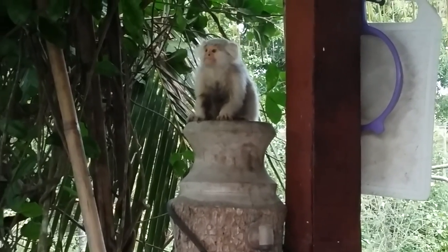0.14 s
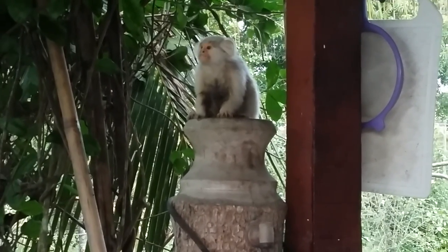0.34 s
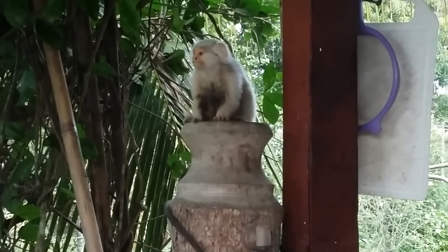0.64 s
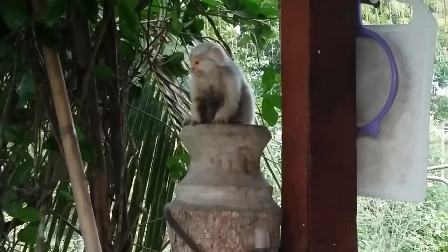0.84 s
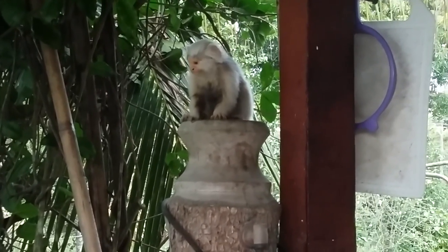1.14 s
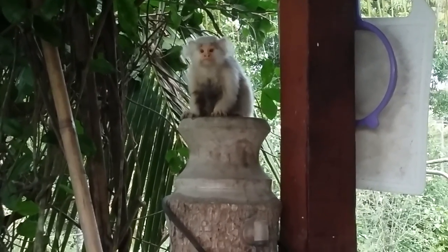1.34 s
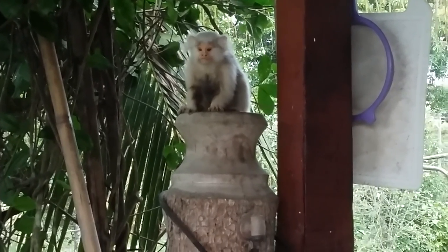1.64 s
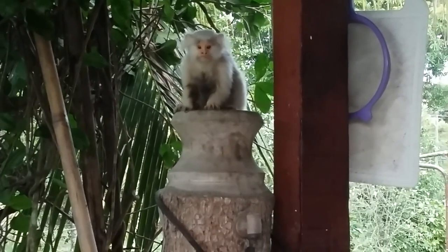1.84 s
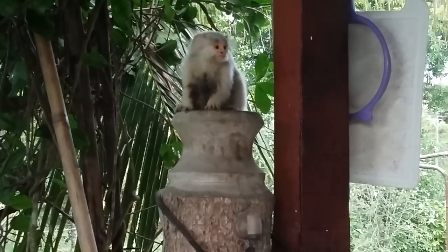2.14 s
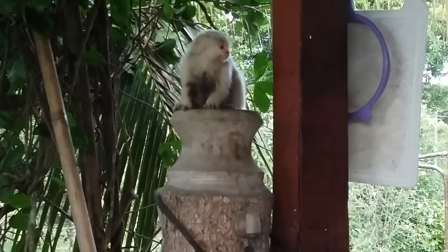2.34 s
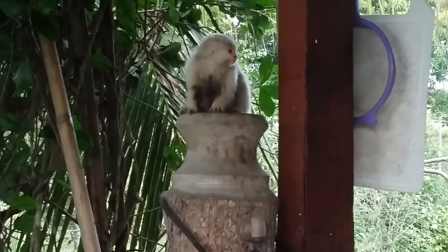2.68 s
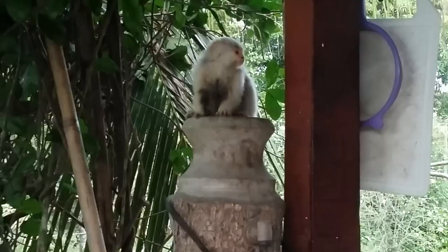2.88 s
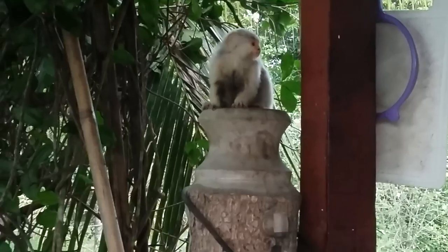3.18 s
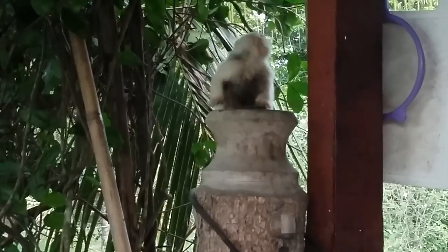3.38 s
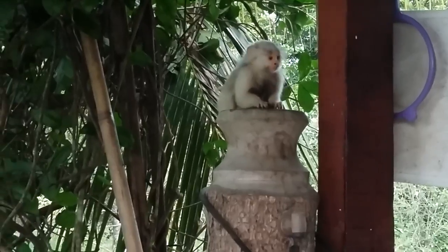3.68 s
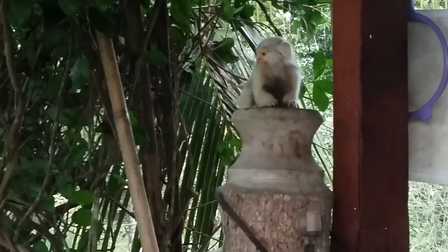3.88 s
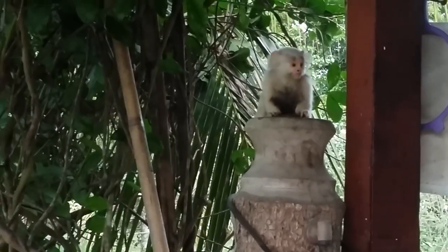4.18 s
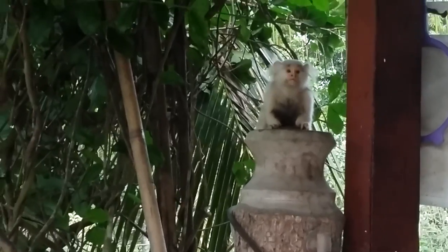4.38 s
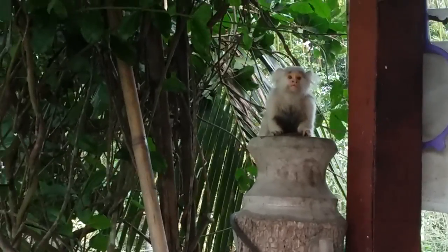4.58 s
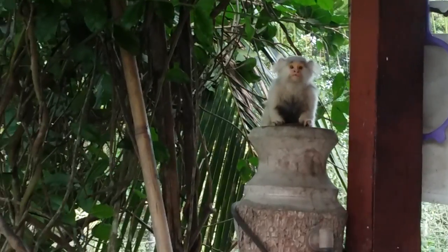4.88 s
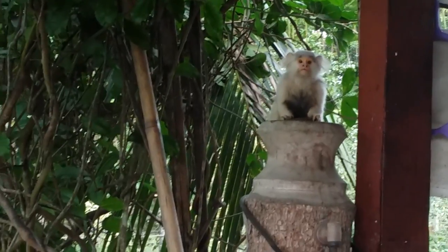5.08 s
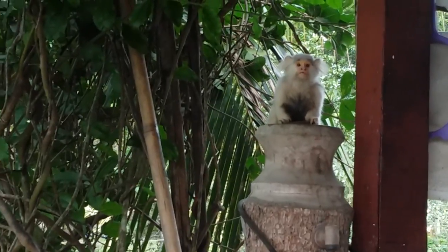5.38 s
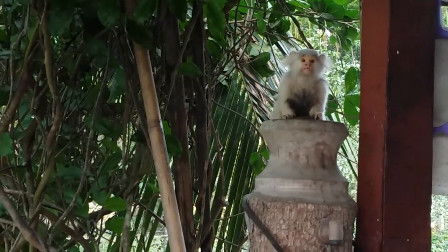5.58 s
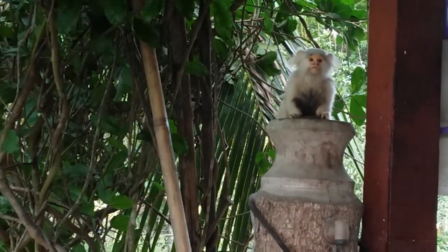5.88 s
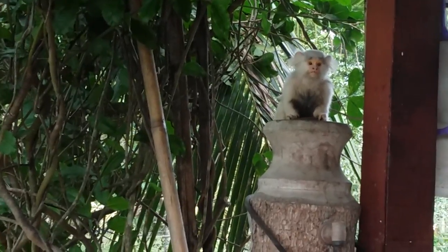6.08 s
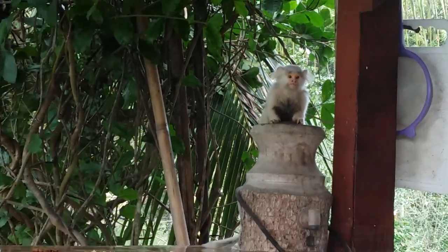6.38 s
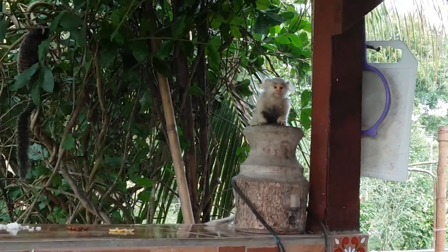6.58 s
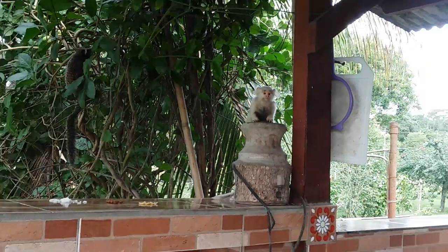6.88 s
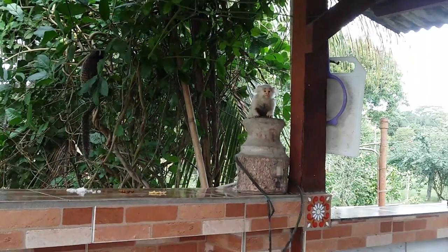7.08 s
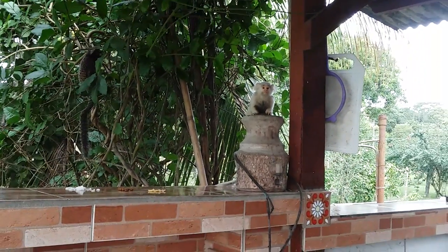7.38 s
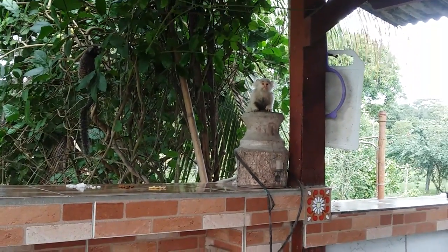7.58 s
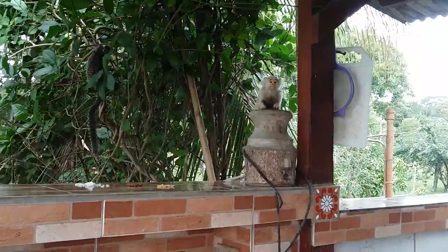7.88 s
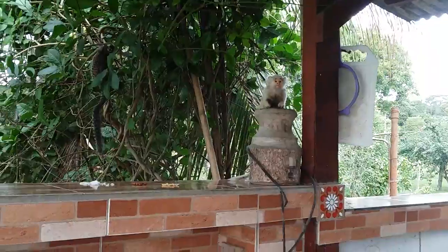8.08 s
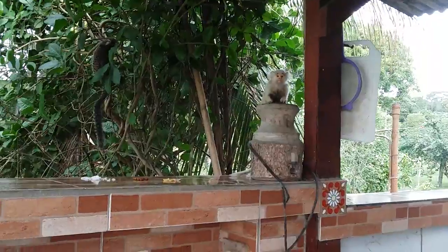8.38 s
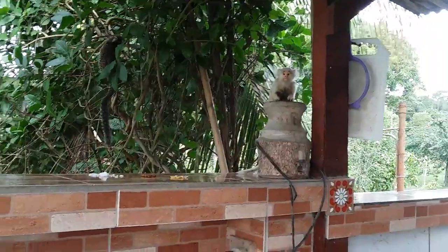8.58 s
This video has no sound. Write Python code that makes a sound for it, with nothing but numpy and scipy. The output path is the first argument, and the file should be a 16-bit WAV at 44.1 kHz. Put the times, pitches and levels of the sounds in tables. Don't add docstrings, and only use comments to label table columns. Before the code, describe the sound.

In a leafy garden by a porch, a low motor hums steadily with distant traffic. A quick twitter comes first, then five clear sliding whistles from a small monkey, mostly falling. Leaves rustle, a distant buzzy see-saw song follows, then two chips. The hum weakens and a softer twitter closes with a dull wooden knock. Small outdoor microphone, calls blurred by foliage.

```python
import sys
import numpy as np
from scipy import signal
from scipy.fft import rfft, irfft
from scipy.io import wavfile
from scipy.ndimage import uniform_filter1d

SR = 44100
rng = np.random.default_rng(int(sys.argv[2]) if len(sys.argv) > 2 else 0)


def gain_from_decibels(decibels):
    exponent = np.asarray(decibels, float) / 20
    return 10 ** exponent


def file_out(sig):
    cols = np.atleast_2d(sig).T
    lim = np.clip(cols, -1, 1)
    pcm = np.round(lim * 32767).astype(np.int16)
    wavfile.write(sys.argv[1], SR, pcm)


N = 385434

# freq_hz, density_db
RUMBLE_SPECTRUM = [(16, -54), (28, -16.5), (38, -20), (65, -13.5), (92, -3), (114, -4), (145, -5),
                   (188, -6), (279, -8.5), (339, -17.5), (420, -22.5), (550, -55.5), (920, -120)]
# freq_hz, density_db
HISS_SPECTRUM = [(190, -9.5), (330, -6.5), (400, 0.7), (580, -3.5), (1050, -2.5), (1680, -6), (2460, -4.5),
                 (3100, -9.5), (3700, -14), (5000, -19.5), (6600, -26.5), (7800, -36.5), (9500, -34),
                 (16500, -31.5)]
# time_s, change_db
TRAFFIC_LEVEL = [(0, 1), (1.3, -0.5), (2.97, 3), (4.45, 1.5), (4.7, 0), (5.4, -4), (5.8, -2.5), (7.33, -8),
                 (8.3, -5.5), (8.74, -7.5)]
# peak_s, half_width_s, level_db
MIDDLE_HISS_SWELLS = [
    (.3, 1, -71.5),
    (3.35, 0.25, -66),
    (4.6, .3, -70),
    (5.3, 0.5, -68.5),
    (8.62, 0.21, -78),
]
# time_s, pitch_hz, level_db
MOTOR_TONE = [(0, 87.9, -33), (2.85, 88.63, -33.5), (3.7, 86.8, -33), (4.45, 86.9, -37), (4.6, 87.82, -37),
              (4.68, 89.7, -45), (4.79, 90.94, -41), (4.89, 90.67, -62), (5.03, 91.3, -38),
              (5.15, 89.1, -48), (5.36, 89.37, -47), (5.8, 88.2, -42), (6.3, 88.36, -40.5),
              (7.08, 89.6, -49), (7.25, 88.4, -59), (7.54, 88.5, -44), (7.9, 87.5, -42.5),
              (8.74, 88.54, -45)]
# time_s, pitch_hz, level_db
VEHICLE_THROB = [(0, 53, -67.5), (1.2, 48.6, -58), (2.1, 49.4, -50), (2.87, 51.9, -43), (3.1, 46.5, -49.5),
                 (3.6, 48.9, -42), (4.2, 46.3, -53), (4.6, 46, -42.5), (5.4, 44.3, -52.5), (6.2, 45.5, -58),
                 (7.4, 45.5, -56), (7.7, 49.7, -64), (8.74, 56.4, -56)]
# start_s, decay_s, level_db, low_hz, sheen_db (sheen: above 8 kHz)
LEAF_RUSTLES = [
    (1.787, .08, -93, 4970, -77.5),
    (3.141, 0.063, -51.5, 600, -74.5),
    (3.18, 0.55, -64.5, 3320, -75.5),
    (3.333, 0.033, -56, 3220, -78),
    (4.313, .016, -54, 586, -72.5),
    (4.336, 0.087, -57.5, 2010, -69),
    (4.4, .045, -59, 3500, -66),
    (4.431, 0.15, -70, 3000, -74),
]
# start_s, decay_s, level_db, low_hz, high_hz
TWIG_KNOCKS = [
    (6.173, 0.0071, -54, 1817, 5630),
    (6.934, 0.0066, -50.5, 1200, 5240),
    (8.437, 0.085, -50, 392, 3120),
    (8.511, .036, -63.5, 2500, 5940),
]
# start_s, length_s, start_hz, end_hz, level_db
DISTANT_NOTES = [(0, 0.034, 3440, 2450, -54), (.23, 0.064, 4500, 3960, -59.5),
                 (.31, .069, 4930, 3940, -57.5), (.38, 0.073, 5120, 3930, -62.5),
                 (3.78, 0.038, 6800, 5830, -67), (4.81, .043, 6630, 5800, -70),
                 (6.81, 0.055, 2945, 2744, -61.5), (7.01, 0.0425, 2900, 3330, -67),
                 (7.25, 0.078, 2620, 3260, -65), (7.44, 0.033, 2950, 3170, -62),
                 (7.63, 0.033, 3100, 2680, -59), (7.42, 0.11, 1114, 1170, -63),
                 (7.75, 0.093, 1200, 1176, -63), (8.405, .036, 6460, 5440, -67),
                 (8.47, .05, 6670, 5400, -69), (8.53, 0.045, 5360, 6380, -69)]
# start_s, length_s, start_hz, end_hz, level_db
FAINT_NOTES = [
    (.115, 0.13, 5070, 5040, -75),
    (.134, 0.14, 3820, 4350, -76),
    (3.745, .07, 5040, 5070, -73),
    (4.211, 0.059, 5150, 5000, -70),
    (5.14, 0.059, 5950, 5892, -79),
    (8.335, 0.061, 7300, 6950, -73.5),
    (8.658, .046, 5700, 5470, -74),
]
# start_s, length_s, top_hz, level_db
ARCHED_NOTES = [
    (1.134, .012, 3130, -58),
    (1.172, 0.017, 2650, -51),
    (1.211, 0.057, 2580, -53),
    (1.249, 0.069, 2670, -80),
    (4.38, 0.054, 2840, -60.5),
    (6.116, 0.03, 3000, -56),
    (8.393, .022, 2600, -53),
    (8.441, 0.059, 2450, -60),
    (8.494, 0.035, 2490, -58),
]
# start_s, top_hz, bottom_hz, level_db
CHIP_CALLS = [
    (5.508, 6320, 4767, -57),
    (5.571, 5910, 4660, -50.5),
]
# start_s, pitch_hz, flick_hz, level_db, flick_db
PEEP_CALLS = [
    (1.131, 7120, 7930, -60.5, -75),
    (2.278, 7130, 8400, -59.5, -78),
    (2.671, 7160, 8140, -56, -86),
    (6.979, 7270, 8550, -59, -82),
    (7.96, 7340, 8460, -56, -74),
]
# start_s, arch_top_hz, arch_db, scoop_delay_s, scoop_db
SEESAW_SONG = [
    (4.489, 4850, -51, 0.096, -53.5),
    (4.689, 4900, -50, 0.095, -51.5),
    (4.895, 4730, -48.5, 0.096, -51.5),
    (5.104, 4766, -46.5, .098, -51.5),
    (5.32, 4780, -47, .088, -51),
]
# start_s, drop_top_hz, drop_db, arch_top_hz, arch_db
TWITTER_SYLLABLES = [(0.467, 3340, -50, 2800, -52), (0.581, 3610, -50.5, 2610, -51.5),
                     (.695, 3780, -51, 2860, -50), (0.81, 3770, -50, 3076, -48.5),
                     (0.917, 4170, -50, 3085, -48.5), (1.033, 4270, -50.5, 2960, -50),
                     (7.734, 3770, -60, 2785, -56.5), (7.847, 3800, -56.5, 3050, -51.5),
                     (7.961, 3940, -52, 3050, -51), (8.074, 4080, -51, 3080, -50.5),
                     (8.185, 3880, -51.5, 3030, -51), (8.296, 3940, -52, 3090, -51)]
# time_s, pitch_hz, level_db
WHISTLE_GLIDES = [
    [(1.34, 2376, -58), (1.375, 2378, -42), (1.43, 2144, -36), (1.5, 2000, -45), (1.56, 1883, -51.5),
     (1.62, 1750, -63)],
    [(1.745, 3765, -57.5), (1.77, 3224, -36.5), (1.8, 2627, -28.5), (1.85, 2230, -30), (1.92, 2016, -38),
     (1.97, 1960, -56), (2.005, 1870, -55)],
    [(2.085, 3580, -61.5), (2.125, 3500, -36.5), (2.17, 3246, -31.5), (2.25, 3022, -29.5),
     (2.32, 2743, -39), (2.36, 2667, -45), (2.375, 2620, -69.5)],
    [(2.635, 1668, -53.5), (2.67, 1950, -43), (2.7, 2065, -39.5), (2.75, 1980, -48), (2.79, 1863, -48),
     (2.83, 1636, -60)],
    [(2.945, 2620, -60), (2.98, 2912, -38.5), (3.03, 2776, -29), (3.08, 2580, -37.5), (3.13, 2475, -35),
     (3.18, 2294, -50.5), (3.21, 2240, -65)],
]
# second_db, third_db
WHISTLE_HARMONICS = [(-26.5, -44), (-37.5, -52), (-36.5, -47), (-34, -65), (-40, -53)]


def rms_one(x):
    return x / np.sqrt(np.mean(x ** 2) + 1e-20)


def in_time(rows):
    time_s, *columns = np.transpose(rows)
    return [np.interp(np.arange(N) / SR, time_s, column) for column in columns]


def drift(rate_hz):
    r = np.exp(-80 * np.pi * rate_hz / SR)
    noise = rng.standard_normal(N // 40 + 2002)
    slow = signal.lfilter([1], [1, -2 * r, r * r], noise)[2000:]
    return np.interp(np.arange(N) / 40, np.arange(len(slow)), rms_one(slow))


def coloured(spectrum):
    hz, db = np.transpose(spectrum)
    grid_hz = np.maximum(np.arange(N // 2 + 1) * SR / N, 1)
    shape = gain_from_decibels(np.interp(np.log(grid_hz), np.log(hz), db, -150, -150))
    return rms_one(irfft(rfft(rng.standard_normal(N)) * shape, N))


def narrow_band(centre_hz, width_hz, side_db):
    return coloured([(centre_hz - width_hz, side_db), (centre_hz, 0), (centre_hz + width_hz, side_db)])


def add_glide(out, rows, warble=0.):
    time_s, hz, db = np.transpose(rows)
    i = np.arange(int(time_s[0] * SR), min(int(time_s[-1] * SR), N))
    shake = np.interp(np.arange(len(i)) / 180, np.arange(100), rng.standard_normal(100))
    glide_hz = uniform_filter1d(np.interp(i / SR, time_s, hz), size=len(i) // 8 + 1, mode="nearest")
    phase = 2 * np.pi * np.cumsum(glide_hz * (1 + warble * shake)) / SR
    edge = np.clip(np.minimum(i - i[0], i[-1] - i) / (0.00098 * SR), 0, 1)
    out[i] += np.sqrt(2) * gain_from_decibels(np.interp(i / SR, time_s, db)) * edge * np.sin(phase)


def trees(x, direct_db, early_t60_s, late_db, late_t60_s, wall_db, wall_s, blur_s):
    t = np.arange(SR) / SR
    scatter = gain_from_decibels(-60 * t / early_t60_s) + gain_from_decibels(late_db - 60 * t / late_t60_s)
    scatter = scatter + gain_from_decibels(wall_db) * np.exp(-((t - wall_s) / blur_s) ** 2)
    echo = scatter * rng.standard_normal(SR) * np.clip(t / 0.0017, 0, 1)
    echo = echo / np.sqrt(np.sum(echo ** 2))
    return gain_from_decibels(direct_db) * x + signal.fftconvolve(x, echo)[:N]


def rumble(traffic_db):
    return gain_from_decibels(-51 + 0.7 * traffic_db + 0.66 * drift(3.7)) * coloured(RUMBLE_SPECTRUM)


def hiss_and_breeze(traffic_db):
    t = np.arange(N) / SR
    hiss = coloured(HISS_SPECTRUM)
    lower = signal.sosfiltfilt(signal.butter(2, 3300, fs=SR, output="sos"), hiss)
    top = signal.sosfiltfilt(signal.butter(2, 7500, "high", fs=SR, output="sos"), hiss)
    leaves = hiss - lower - top
    breeze = sum(gain_from_decibels(db) * np.exp(-((t - peak_s) / width_s) ** 2) for peak_s, width_s, db in MIDDLE_HISS_SWELLS)
    stir = np.hypot(gain_from_decibels(-75 + 0.62 * traffic_db), breeze)
    out = gain_from_decibels(-56 + 0.44 * traffic_db + 0.6 * drift(2.4)) * rms_one(lower)
    out = out + stir * gain_from_decibels(2.4 * drift(9.4)) * rms_one(leaves)
    return out + gain_from_decibels(-81.0) * rms_one(top)


def insect():
    whirr_db, = in_time([(0, -100), (4.5, -97), (5.2, -91), (8.74, -90)])
    return coloured([(6950, -20), (7150, 0), (7300, 0), (7500, -20)]) * gain_from_decibels(whirr_db + 3 * drift(9))


def drone():
    stop_s, fade_s = 6.2, 0.045
    gate = np.clip((stop_s - np.arange(N) / SR) / fade_s, 0, 1)
    return narrow_band(280.8, 16, side_db=-12) * gain_from_decibels(-61.5) * gate


def motor(traffic_db):
    hz, db = in_time(MOTOR_TONE)
    beat_start_s, beat_hz, beat_slowing_hz_per_s, beat_depth_db = 6.47, 5.11, .814, 3
    since_s = np.arange(N) / SR - beat_start_s
    beat_phase = 2 * np.pi * since_s * (beat_hz - beat_slowing_hz_per_s * since_s / 2)
    beat_db = beat_depth_db * np.clip(5 * since_s + 1, 0, 1) * np.cos(beat_phase)
    phase = 2 * np.pi * np.cumsum(hz) / SR + 0.37 * drift(7.5)
    firing = gain_from_decibels(db + 0.83 * drift(12) + beat_db) * -np.cos(phase)
    octave = gain_from_decibels(0.61 * traffic_db - 60 + 3.6 * drift(3.4)) * np.sin(2 * phase)
    side_paths = gain_from_decibels(-55) * narrow_band(88, 8, side_db=-15)
    return np.sqrt(2) * (firing + octave) + side_paths


def wavering_tone(hz, db):
    phase = 2 * np.pi * np.cumsum(hz) / SR + 1.1 * drift(4.6)
    return np.sqrt(2) * gain_from_decibels(db + 2.7 * drift(13)) * np.sin(phase)


def vehicle():
    return wavering_tone(*in_time(VEHICLE_THROB))


def neighbour_machine():
    start_hz, rise_hz_per_s, level_db = 99.7, 0.29, -54.5
    return wavering_tone(start_hz + rise_hz_per_s * np.arange(N) / SR, level_db)


def gritty_burst(out, start_s, decay_s, db, low_hz, high_hz, sheen_db):
    t = np.arange(SR) / SR
    grain = gain_from_decibels(2.0 * rng.standard_normal(len(t) // 98).repeat(98))
    grit = rng.standard_normal(len(t)) * grain
    body = signal.sosfilt(signal.butter(8, [low_hz, high_hz], "band", fs=SR, output="sos"), grit)
    sheen = signal.sosfilt(signal.butter(4, 8000, "high", fs=SR, output="sos"), grit)
    fade = np.exp(-(t / decay_s) ** 0.83) * np.clip(t / 0.0027, 0, 1)
    burst = fade * (gain_from_decibels(db) * rms_one(body) + gain_from_decibels(sheen_db) * rms_one(sheen))
    i = int(start_s * SR)
    out[i:i + len(t)] += burst[:N - i]


def rustles():
    out = np.zeros(N)
    for start_s, decay_s, db, low_hz, sheen_db in LEAF_RUSTLES:
        gritty_burst(out, start_s, decay_s, db, low_hz, 6700, sheen_db)
    return out


def twigs():
    out = np.zeros(N)
    for start_s, decay_s, db, low_hz, high_hz in TWIG_KNOCKS:
        gritty_burst(out, start_s, decay_s, db, low_hz, high_hz, db - 26)
    return out


def straight_notes(table, warble):
    out = np.zeros(N)
    for s, length_s, start_hz, end_hz, db in table:
        middle = (s + length_s / 2, (start_hz + end_hz) / 2, db)
        add_glide(out, [(s, start_hz, db - 3), middle, (s + length_s, end_hz, db - 5.0)], warble)
    return out


def arched_notes():
    out = np.zeros(N)
    for s, length_s, hz, db in ARCHED_NOTES:
        rows = [(s, .87 * hz, db - 13.5), (s + length_s / 2, hz, db), (s + length_s, .83 * hz, db - 5.0)]
        add_glide(out, rows, warble=.006)
    return out


def chips():
    out = np.zeros(N)
    for s, top_hz, bottom_hz, db in CHIP_CALLS:
        held = [(s, .99 * top_hz, db), (s + 0.0086, top_hz, db)]
        plunge = [(s + 0.012, .94 * top_hz, db - 3.5), (s + 0.024, bottom_hz, db - 6.0)]
        add_glide(out, held + plunge)
    return out


def peeps():
    out = np.zeros(N)
    for s, hz, flick_hz, db, flick_db in PEEP_CALLS:
        held = [(s, 1.018 * hz, db - 9), (s + .022, .992 * hz, db - 2),
                (s + .04, 1.005 * hz, db), (s + .052, 1.035 * hz, db - 5)]
        flick = [(s + .064, .94 * flick_hz, flick_db + 2), (s + .095, flick_hz, flick_db - 3)]
        add_glide(out, held + flick, warble=.005)
    return out


def seesaw():
    out = np.zeros(N)
    for s, top_hz, db, delay_s, scoop_db in SEESAW_SONG:
        arch = [(s - .006, .8 * top_hz, db - 9), (s + .016, top_hz, db - 2), (s + .032, .85 * top_hz, db + 1),
                (s + .046, .99 * top_hz, db), (s + .06, .84 * top_hz, db + 1), (s + .078, .97 * top_hz, db - 5)]
        add_glide(out, arch, warble=.03)
        t = s + delay_s
        scoop = [(t - .012, 4050, scoop_db - 10), (t + .018, 2950, scoop_db + 5.5),
                 (t + 0.0272, 2550, scoop_db - 3.0), (t + 0.062, 2900, scoop_db - 0.5),
                 (t + 0.086, 3250, scoop_db - 0.5)]
        add_glide(out, scoop, warble=.035)
    return out


def twitter():
    turns_away_s = 4
    away, toward = np.zeros((2, N))
    for s, top_hz, db, arch_hz, arch_db in TWITTER_SYLLABLES:
        drop = [(s - .004, .95 * top_hz, db - 9), (s + .003, .98 * top_hz, db - 3),
                (s + .009, .88 * top_hz, db + 4), (s + .019, .77 * top_hz, db + 1)]
        add_glide(away, drop, warble=.012)
        rise = [(s + .036, .85 * arch_hz, arch_db - 7), (s + .052, .98 * arch_hz, arch_db - 4),
                (s + .062, arch_hz, arch_db + 1)]
        hook = [(s + .07, .9 * arch_hz, arch_db + 2), (s + .077, .79 * arch_hz, arch_db - 2),
                (s + .084, .95 * arch_hz, arch_db - 1), (s + .092, arch_hz, arch_db - 6)]
        add_glide(toward if s < turns_away_s else away, rise + hook, warble=.01)
    return away, toward


def whistles():
    out = np.zeros(N)
    for rows in WHISTLE_GLIDES:
        add_glide(out, rows)
    return out


def whistle_overtones():
    out = np.zeros(N)
    for rows, harmonics_db in zip(WHISTLE_GLIDES, WHISTLE_HARMONICS):
        time_s, hz, db = np.transpose(rows)
        for multiple, under_db in zip((2, 3), harmonics_db):
            level_db = db.max() + .7 * (db - db.max()) + under_db - 2.0
            add_glide(out, np.transpose([time_s, multiple * hz, level_db]), warble=.012)
    return out


def scene():
    traffic_db, = in_time(TRAFFIC_LEVEL)
    air = rumble(traffic_db) + hiss_and_breeze(traffic_db) + insect() + drone()
    machines = motor(traffic_db) + vehicle() + neighbour_machine()
    foliage = rustles() + twigs()
    away, toward = twitter()
    far = trees(seesaw() + straight_notes(DISTANT_NOTES, warble=.055), direct_db=-9, early_t60_s=.45,
                late_db=-10, late_t60_s=1.1, wall_db=-12, wall_s=.05, blur_s=.03)
    high = trees(peeps() + chips(), direct_db=-16, early_t60_s=.6,
                 late_db=-12, late_t60_s=0.91, wall_db=-14.5, wall_s=0.11, blur_s=0.0088)
    behind = trees(away + whistle_overtones(), direct_db=-6, early_t60_s=.33,
                   late_db=-13, late_t60_s=1.0, wall_db=-7, wall_s=.042, blur_s=.008)
    middle = trees(toward + arched_notes() + straight_notes(FAINT_NOTES, warble=.006), direct_db=-1,
                   early_t60_s=.4, late_db=-14, late_t60_s=.8, wall_db=-2, wall_s=.045, blur_s=.004)
    near = trees(whistles(), direct_db=-8.5, early_t60_s=0.31,
                 late_db=-20.5, late_t60_s=1.0, wall_db=-12.5, wall_s=0.085, blur_s=0.013)
    return (air + machines + foliage + far + high + behind + middle + near)[None]


def low_pass(x):
    return signal.sosfilt(signal.butter(12, 15720, fs=SR, output="sos"), x)


def record(dry):
    heard = signal.sosfilt(signal.butter(6, 40, "high", fs=SR, output="sos"), dry) - .0007
    return low_pass(heard)


dry = scene()
out = record(dry)
file_out(out)
```